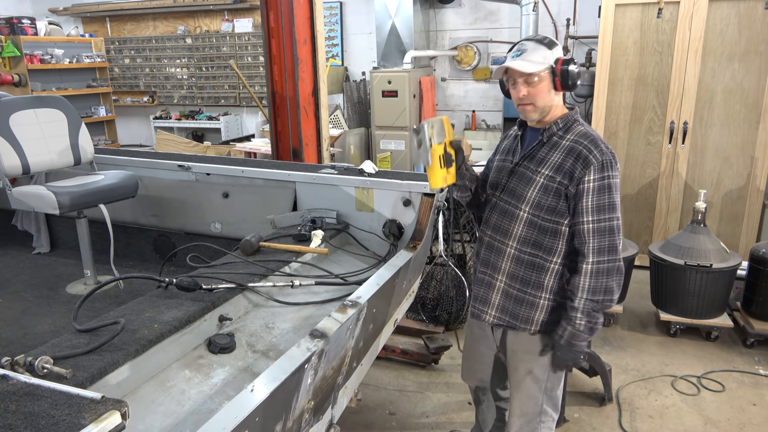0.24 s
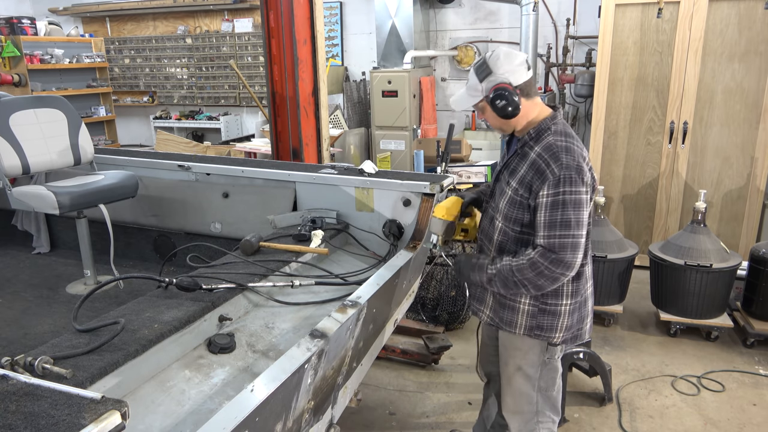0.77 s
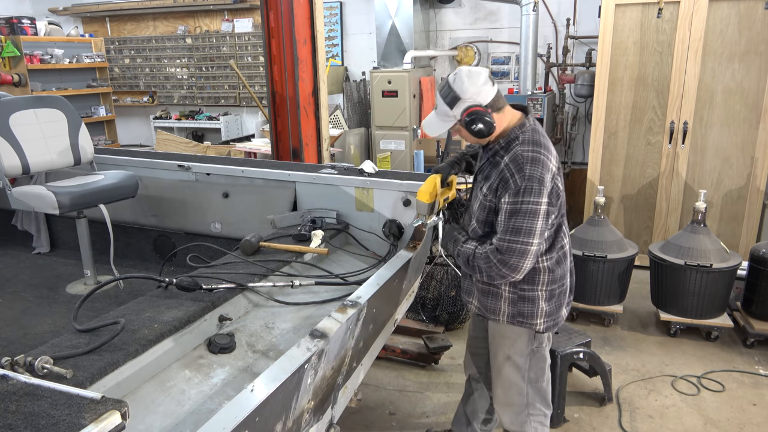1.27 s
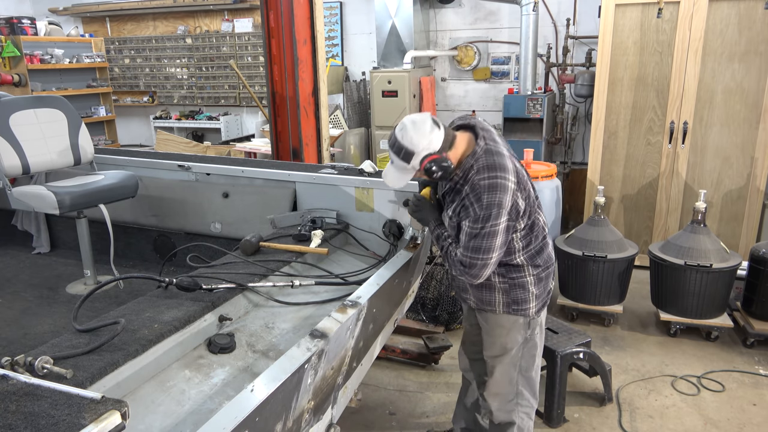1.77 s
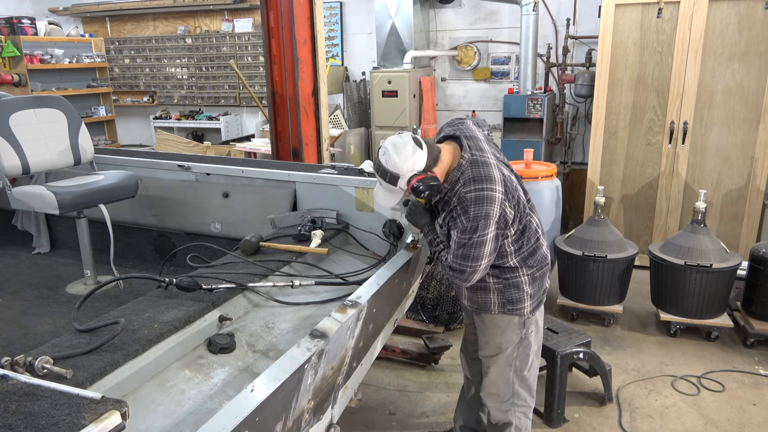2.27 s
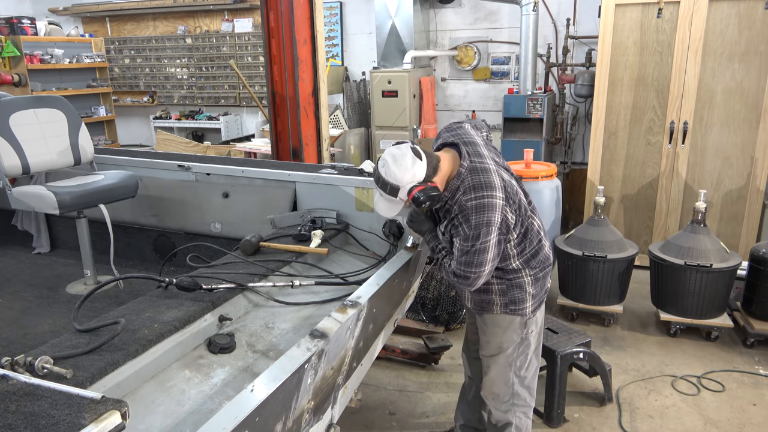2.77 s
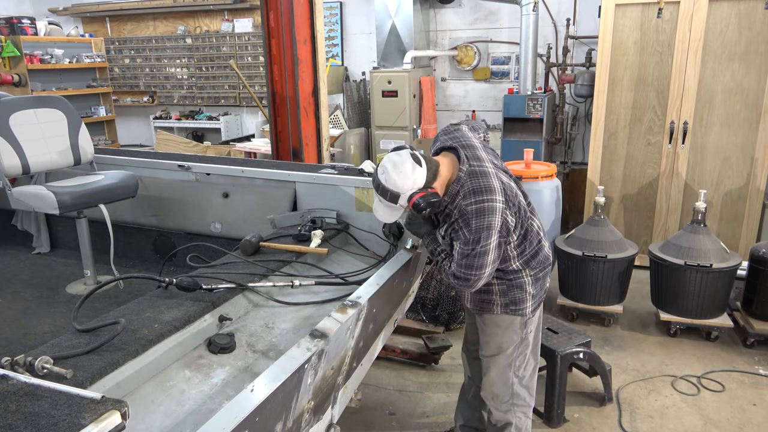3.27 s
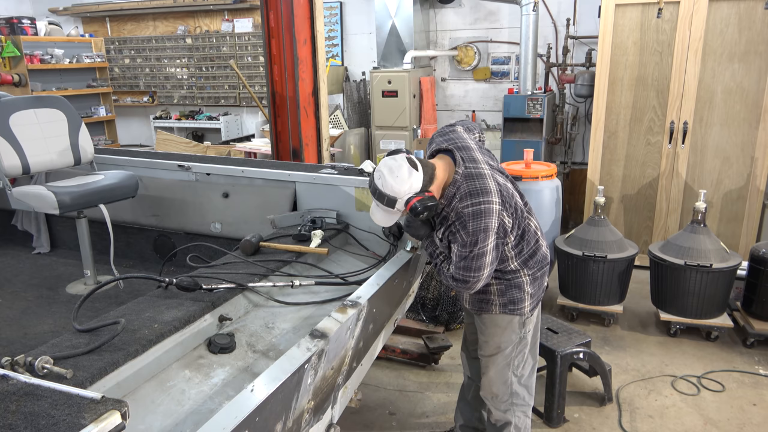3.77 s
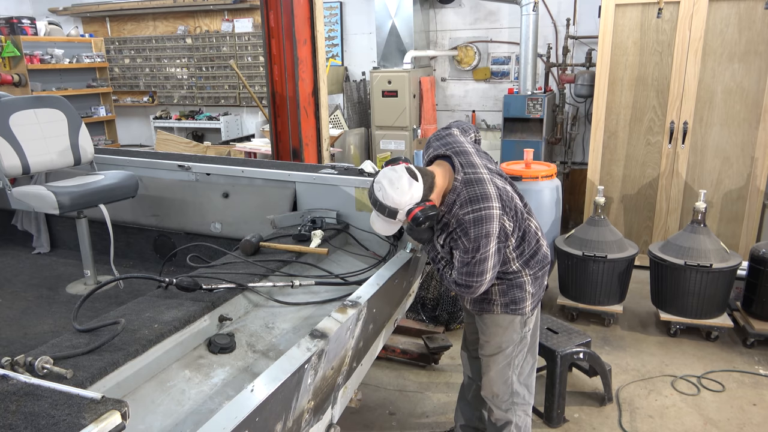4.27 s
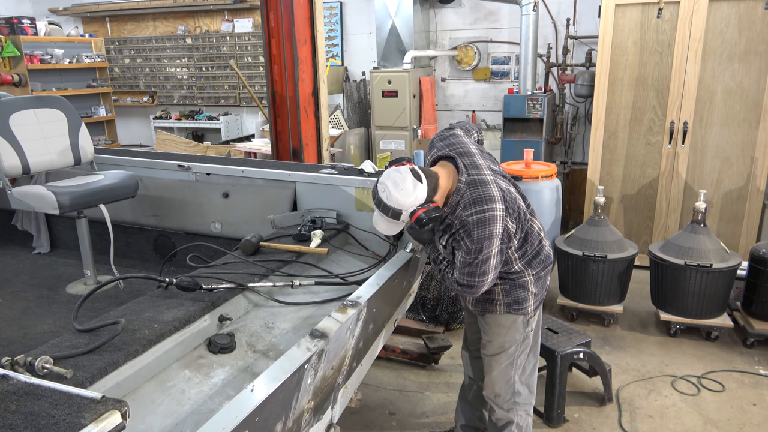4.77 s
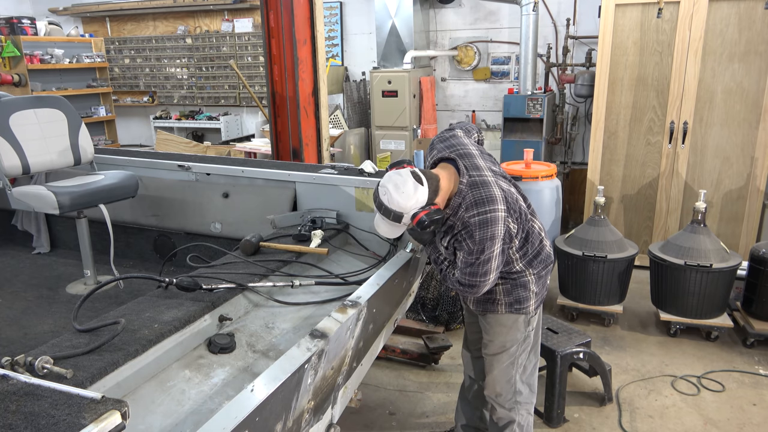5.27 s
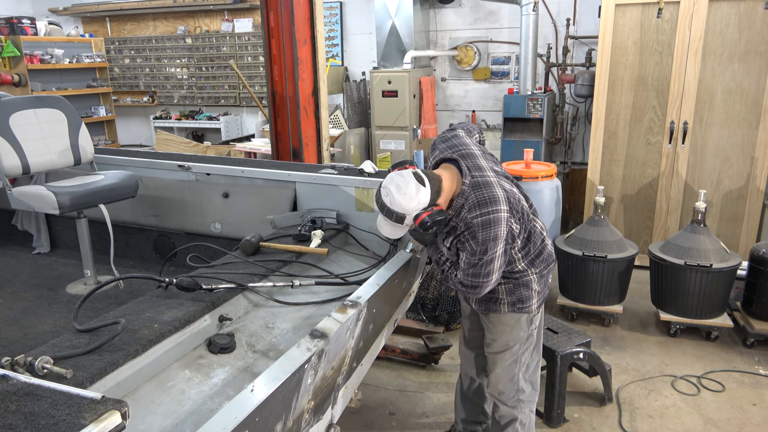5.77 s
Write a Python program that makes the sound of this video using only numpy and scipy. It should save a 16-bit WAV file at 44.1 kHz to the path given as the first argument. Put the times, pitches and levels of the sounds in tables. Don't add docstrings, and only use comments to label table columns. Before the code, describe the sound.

From 0 to about 0.7 s a jigsaw coasts to rest: a falling whine and gear roar fade, with blade-rod clicks spreading apart at 0.07, 0.17, 0.3 and 0.5 s. A low room hush remains. Between 1 and 2.6 s, boots and sleeves scuff softly; a crisp plastic snap and light knock fall at 1.86 s. A faint glove creak comes near 3.05 s, then a double plastic tick with a thin blade clink at 3.37 s. A firm knock on aluminium at 4.05 s leads to the loudest at 4.42 s, trailing a gritty skid, then a double knock and bright clamp clink around 4.62 s and a smaller knock at 4.96 s. At 5.05 s the motor starts, sweeps up steeply by 5.4 s, then climbs slightly to a steady buzzing roar, hiss and whine until 6 s. Short hard-walled reverberation, stereo microphones a few metres away.

```python
import sys
import numpy as np
from scipy import signal
from scipy.fft import rfft, irfft, next_fast_len
from scipy.io import wavfile
from scipy.ndimage import uniform_filter1d, map_coordinates

SR = 44100
rng = np.random.default_rng(int(sys.argv[2]) if len(sys.argv) > 2 else 0)


def log_audio(samples):
    frames = np.atleast_2d(samples).T
    limited = np.clip(frames, -1, 1)
    pcm = np.round(limited * 32767).astype(np.int16)
    wavfile.write(sys.argv[1], SR, pcm)


def field_ratio(decibels):
    return 10 ** (np.asarray(decibels, dtype=float) / 20)


N = 265923


def unit(x):
    return x / np.sqrt(np.mean(x ** 2) + 1e-20)


def along(points, hz):
    f, v = np.transpose(points)
    return np.interp(np.log(hz + 1), np.log(f + 1), v)


def curves(rows, outside=None):
    s, *cols = np.transpose(rows)
    return [np.interp(np.arange(N) / SR, s, c, outside, outside) for c in cols]


def wobble(rate):
    knots = rng.standard_normal(int(N * rate / SR) + 4)
    return map_coordinates(knots, [np.arange(N) * rate / SR])


def filtered(x, response):
    m = next_fast_len(N + SR // 2)
    return irfft(rfft(x, m) * response(np.fft.rfftfreq(m, 1 / SR)), m)[..., :N]


def modes(table):
    def response(f):
        total = 0
        for k, (centre, width, db) in enumerate(table):
            ring = 1j * f * width / (centre ** 2 - f ** 2 + 1j * f * width)
            total = total + (-1) ** k * field_ratio(db) * ring
        return total
    return response


def band(lo_hz, hi_hz):
    return lambda f: (1j * f / lo_hz / (1 + 1j * f / lo_hz) / (1 + 1j * f / hi_hz)) ** 2


def noise(response, grain_db=0):
    grain = np.repeat(rng.standard_normal(N // 20 + 1), 20)[:N]
    return unit(filtered(field_ratio(grain_db * grain) * rng.standard_normal(N), response))


# frequency in Hz, time to die by 60 dB in seconds
SHOP_DECAY = [(60, 0.67), (200, 0.37), (1000, 0.59), (4000, 0.47), (14000, 0.26)]


def room(x):
    hz, t, z = signal.stft(rng.standard_normal(SR // 2), SR, nperseg=256)
    decay = field_ratio(-60 * t / along(SHOP_DECAY, hz)[:, None])
    tail = signal.istft(z * decay, SR, nperseg=256)[1]
    late = np.pad(x, (250, 0))
    return signal.fftconvolve(late, tail / np.linalg.norm(tail))[:len(x)]


# frequency in Hz, level in dB per Hz
HUSH_COLOUR = [(12, -34), (20, -6.5), (67, -1.5), (234, -26.5), (422, -24), (485, -26.5), (698, -22),
               (759, -31), (1000, -24), (1120, -24.5), (1860, -34.5), (3950, -37.5), (16000, -41.5)]


def hush():
    level_db = -56.5 + 1.0 * wobble(6.95)
    duck_db = -6 * np.clip(np.arange(N) / SR - 4.9, 0, 1)
    return field_ratio(level_db + duck_db) * noise(lambda f: field_ratio(along(HUSH_COLOUR, f)))


def stroke_gain(peak_s, rise_s, hold_s, db):
    t = np.arange(N) / SR - peak_s
    fall_db = 45 * np.clip(t, 0, hold_s) + 105 * np.clip(t - hold_s, 0, None)
    rise_db = 20 * np.clip(-t, 0, None) / max(rise_s, .003)
    return field_ratio(db - fall_db - rise_db)


# peak in seconds, rise in seconds, hold in seconds, rub in dB, thud in dB
RUB_STROKES = [(0.987, 0.36, .02, -58, -9), (1.085, 0.092, 0.0011, -58.5, 3),
               (1.261, 0.03, 0.0037, -45.5, -4), (1.46, 0.13, .02, -79, 4), (1.62, 0.081, 0.033, -54, -4.5),
               (1.705, 0.064, 0.0045, -38.5, 3), (1.886, 0.022, 0.12, -47.5, -5.5),
               (2.187, .06, 0.14, -75.5, 11.5), (2.58, 0.055, 0.048, -51, -7.5),
               (3.164, 0.012, .005, -65.5, 12.5), (3.783, .03, 0.065, -83.5, 19),
               (4.01, .07, 0.092, -59, 5), (5.093, 0.021, .005, -41.5, 14)]
# peak in seconds, hold in seconds, rub, thud and grit in dB
SKID_STROKES = [
    (4.437, 0.16, -26.5, -3, -8),
    (4.652, 0.014, -32.5, 0.5, -20),
    (4.966, 0.017, -42, 7.5, -25),
]
# frequency in Hz, level in dB per Hz
RUB_COLOUR = [(88, -47), (150, -25), (244, -8), (285, -5.5), (420, 0), (462, -1), (509, -1), (1040, -4.5),
              (3620, -3), (12300, -40.5), (15500, -63)]
# frequency in Hz, width in Hz, level in dB
SHOE_RING = [(2030, 430, 9), (3400, 1000, -17.5)]


def scuffs():
    rubs = [(stroke_gain(s, rise, hold, db), thud_db, -3) for s, rise, hold, db, thud_db in RUB_STROKES]
    skids = [(stroke_gain(s, .013, hold, db), thud_db, grit_db)
             for s, hold, db, thud_db, grit_db in SKID_STROKES]

    def under(f, edge_hz):
        return 1 / np.sqrt(1 + (f / edge_hz) ** 4)

    colour = lambda f: field_ratio(along(RUB_COLOUR, f))
    thud = noise(lambda f: colour(f) * under(f, 740))
    hiss = noise(lambda f: colour(f) * (1 - under(f, 760)) * under(f, 2750), grain_db=2)
    grit = noise(lambda f: colour(f) * (1 - under(f, 5840)), grain_db=2.5)
    out = np.zeros(N)
    for gain, thud_db, grit_db in rubs + skids:
        out += gain * (field_ratio(thud_db) * thud + hiss + field_ratio(grit_db) * grit)
    out += field_ratio(-8) * sum(row[0] for row in skids) * noise(modes(SHOE_RING), grain_db=1)
    creak_db = -61 - 11 * ((np.arange(N) / SR - 3.055) / 0.043) ** 2
    creak = field_ratio(creak_db) * noise(modes([(1380, 470, 3), (2010, 500, -9)]), grain_db=-6)
    return creak + field_ratio(0.24 * wobble(40)) * out


# time in seconds, peak in dB
PLASTIC_TICKS = [(1.573, -42), (1.8635, -22), (2.497, -46), (3.168, -52), (3.185, -44), (3.364, -27.5),
                 (3.381, -31)]


def snaps():
    ticks = np.zeros(N)
    for s, db in PLASTIC_TICKS:
        ticks[round(s * SR)] = field_ratio(db + 9)
    dry = filtered(ticks, band(4500, 17000))
    return dry + field_ratio(4.5) * room(dry)


# start in seconds, peak in dB, then boom, knock and sizzle in dB
CONTACTS = [(1.236, -49.5, -22, -28, 12), (1.573, -40.5, -37, -32, -11), (1.863, -30, -26, -35, -6),
            (2.495, -58, -22, -16, 2), (3.167, -43, -15, -5, -6.5), (3.365, -36.5, -21, -4.5, 6),
            (3.788, -62.5, -3, 16, -0.5), (4.05, -19, -17.5, -5.5, -42), (4.424, -7, -30, -26, -39),
            (4.611, -12.5, -12.5, -11, -4.5), (4.628, -10, -17.5, -11, -50.5),
            (4.881, -30, -19.5, -17, -19), (4.961, -18, -30, -17, -27)]
# time in seconds, blade in dB, clamp in dB
STEEL_CLINKS = [
    (2.4968, -70, -43),
    (3.364, -25.5, -42),
    (4.6298, -45, -9),
    (4.9605, -42, -32),
]
# frequency in Hz, width in Hz, level in dB
HULL_RING = [(71, 20, -2.5), (120.4, 42, -1.5)]
# frequency in Hz, width in Hz, level in dB
PANEL_RING = [(217, 21.4, 3.5), (276, 16, -0.5), (322, 25, -5.5)]
# frequency in Hz, width in Hz, level in dB
SHEET_RING = [(473, 57, -3), (720, 250, -24), (1240, 110, -12), (2200, 3600, 0.5)]
# frequency in Hz, width in Hz, level in dB
BLADE_RING = [(2780, 10, 2), (2900, 14, 0), (3350, 25, -1), (8995, 25, 6)]
# frequency in Hz, width in Hz, level in dB
CLAMP_RING = [(4700, 300, -10), (6040, 360, 3), (6874, 200, -26), (6940, 220, 1), (12800, 400, -14)]


def knocks():
    t = np.arange(SR // 4) / SR
    rattle = (1 - np.exp(-t / 0.00038)) * (np.exp(-t / 0.012) + 0.79 * np.exp(-t / 0.00044))
    shove = np.exp(-((t - .005) / 0.00043) ** 2)
    crack, sheet, hull, panel, sizzle, blade, clamp = np.zeros((7, N + SR))
    for s, db, boom_db, knock_db, sizzle_db in CONTACTS:
        start = round(s * SR)
        at = slice(start, start + len(t))
        force = field_ratio(db) * rattle * rng.standard_normal((3, len(t)))
        crack[at] += force[0]
        sheet[at] += field_ratio(-6.5) * force[1]
        hull[at] += field_ratio(db + boom_db + 24) * shove
        panel[at] += field_ratio(db + knock_db + 15) * shove
        sizzle[at] += field_ratio(sizzle_db + 7) * force[2]
    for s, blade_db, clamp_db in STEEL_CLINKS:
        blade[round(s * SR)] = field_ratio(blade_db + 26)
        clamp[round(s * SR)] = field_ratio(clamp_db + 19)

    dull = band(100, 6000)
    parts = [
        (crack, lambda f: band(197, 2820)(f) * dull(f)),
        (sheet, lambda f: modes(SHEET_RING)(f) * dull(f)),
        (hull, modes(HULL_RING)),
        (panel, modes(PANEL_RING)),
        (sizzle, lambda f: band(5000, 10000)(f) / (1 + 1j * f / 11000) ** 2),
        (blade, modes(BLADE_RING)),
        (clamp, lambda f: modes(CLAMP_RING)(f) * band(3000, 20000)(f)),
    ]
    dry = sum(filtered(x[:N], colour) for x, colour in parts)
    out = np.pad(dry, (0, SR))
    starts = [round(row[0] * SR) for row in CONTACTS] + [N]
    for a, b in zip(starts, starts[1:]):
        piece = np.pad(dry[a:min(b, a + SR // 2)], (0, SR // 2))
        out[a:a + len(piece)] += room(piece)
    return out[:N]


# time in seconds, peak in dB
SLOW_REVERSALS = [
    (.0703, -28.5),
    (0.171, -33),
    (0.2981, -36.5),
    (.5029, -46),
    (5.0924, -36),
    (5.165, -31),
]


def reversals(stroke):
    first = round(5.213 * SR)
    cycle = np.floor((stroke[first:] - stroke[first]) / (2 * np.pi))
    turn = first + np.flatnonzero(np.diff(cycle, prepend=-1))
    ticks = np.zeros(N)
    ticks[turn] = field_ratio(-31.5 + 3.1 * rng.standard_normal(len(turn)))
    for s, db in SLOW_REVERSALS:
        ticks[round(s * SR)] = field_ratio(db)
    ticks += .6 * np.roll(ticks, round(.013 * SR))
    guide = modes([(8600, 990, -13), (11140, 760, 4), (13400, 900, -1), (15300, 900, -8)])
    burst = field_ratio(34) * filtered(ticks, lambda f: guide(f) * band(7000, 20000)(f))
    return burst + field_ratio(1) * room(burst)


# time in seconds, turns in Hz, gear mesh in dB
COASTING = [(0, 112, -46), (.1, 95, -41), (.2, 80, -36), (.3, 64.7, -39), (.45, 46, -49), (.56, 31, -68),
            (.8, 12, -110)]
# time in seconds, turns in Hz
RUN_UP = [(5.03, 20), (5.3, 300), (5.35, 327), (5.408, 348), (5.466, 362), (5.604, 381.5), (5.78, 396.5),
          (5.9, 401), (6.03, 403)]
# time in seconds, roar in dB
GEAR_ROAR = [
    [(0.0, -31.5), (0.04, -24), (0.272, -25.5), (0.29, -28), (0.356, -27), (0.44, -29), (0.59, -37.5),
     (0.788, -62), (0.85, -64.5)],
    [(5.02, -37), (5.06, -32.5), (5.106, -25), (5.182, -20), (5.194, -22.5), (6.03, -23)],
]
# frequency in Hz, level in dB per Hz
GEAR_COLOUR = [(120, -60), (200, -30), (281, -20), (385, -6), (431, -4), (549, 0.5), (818, 2), (1740, 0.5),
               (6000, -12), (7800, -43), (13200, -120)]
# frequency in Hz, width in Hz, level in dB
HOUSING_RING = [(382, 18, -11), (504, 84, -13.5), (792, 10.6, -0.5), (936, 18, -4.5), (1327, 10, 1.5),
                (1663, 15, -2.5), (1885, 84, -5.5), (2108, 20, 4.5), (2290, 420, -3.5), (3150, 70, 1),
                (3640, 40, -12)]
# frequency in Hz, level in dB per Hz
AIR_COLOUR = [(2060, -6), (3500, 1), (5600, -3), (6360, 0), (9200, -7), (10400, -11.5), (11000, -12),
              (15100, -20.5), (16000, -48)]


def roar(stroke):
    gears = uniform_filter1d(sum(field_ratio(curves(rows, -200)[0]) for rows in GEAR_ROAR), size=200)
    turns = np.where(np.arange(N) < SR, curves(COASTING)[0], curves(RUN_UP)[0])
    air = gears * field_ratio(0.2) * (1 + (103 / turns) ** 2) ** (-1.15 / 2)
    beat = np.cos(2 * stroke)
    body = lambda f: field_ratio(along(GEAR_COLOUR, f)) * (1 + 2.66 * np.abs(modes(HOUSING_RING)(f)))
    rumble = field_ratio(0.8 * beat + 0.7 * wobble(20)) * noise(body, grain_db=0.5)
    breath = lambda f: field_ratio(along(AIR_COLOUR, f)) * band(150, 40000)(f)
    hiss = field_ratio(0.77 * beat + 0.2 * wobble(4)) * noise(breath, grain_db=1.5)
    return gears * rumble + air * hiss


# multiple of the turns, level in dB, resonance in Hz, its width in octaves
ORDER_LIFTS = [(1, -42, 280, 1.2), (1, -33, 300, .06), (1, -29, 380, .11), (13, -26, 1900, .3),
               (13, -32, 2700, .5), (13, -26, 3500, .13), (13, -31, 4600, .14), (13, -45, 5200, .2),
               (26, -54, 8000, 2.2), (26, -40, 10200, .18), (26, -36, 10450, .012), (39, -39, 12100, .13)]


def order_gain(multiple, turns):
    gain = 0
    for k, db, peak_hz, octaves in ORDER_LIFTS:
        if k == multiple:
            gain = gain + field_ratio(db - 12 * (np.log2(k * turns / peak_hz) / octaves) ** 2)
    if multiple != 1:
        return gain
    since = np.arange(N) / SR - 5.76
    pressed = 1 / (1 + np.exp(np.clip(-since / .012, -50, 50)))
    return gain * field_ratio(np.minimum(-15 + 45 * since, 0) * pressed)


# multiple of the turns, blur in Hz, level in dB, resonance in Hz, width in octaves
MESH_ORDERS = [(2, 30, -35, 788, .03), (8, 200, -26, 2100, .8), (16, 320, -29, 6350, .3),
               (32, 250, -43, 11800, .15)]
# multiple of the blade stroke, level in dB
CRANK_ORDERS = [(2, -55), (3, -39), (4, -49), (5, -43), (6, -47), (7, -44), (8, -41), (10, -40), (11, -44)]


def whine():
    turns = uniform_filter1d(curves(RUN_UP)[0], size=2000)
    on = np.clip((np.arange(N) / SR - RUN_UP[0][0]) / 0.05, 0, 1)
    phase = 2 * np.pi * np.cumsum(turns) / SR
    stroke = phase / 9
    out = np.zeros(N)
    for k in (1, 13, 26, 39):
        out += np.sqrt(2) * order_gain(k, turns) * field_ratio(1.8 * wobble(50)) * np.sin(k * phase)
    for k, blur, db, peak_hz, octaves in MESH_ORDERS:
        detune = np.log2(k * turns / peak_hz) / octaves
        out += field_ratio(db - 12 * detune ** 2) * (.4 + wobble(blur)) * np.sin(k * phase)
    out += field_ratio(-38.5) * noise(lambda f: band(130, 400)(f) ** 2)
    shake = np.clip(turns / 300, 0, 1) ** 3
    for k, db in CRANK_ORDERS:
        throb = np.sin(k * stroke + rng.uniform(0, 6.25))
        out += np.sqrt(2) * field_ratio(db + 0.86 * wobble(15)) * shake * throb
    slow_turns, slow_db = curves(COASTING)[0], curves(COASTING, -200)[1]
    slow_phase = 2 * np.pi * np.cumsum(slow_turns) / SR
    dying = np.zeros(N)
    for k, db in ((5, -34), (8, 0), (13, -5), (16, -4)):
        dying += field_ratio(db + 3.1 * wobble(26.5)) * np.sin(k * slow_phase)
    return on * out + field_ratio(slow_db) * dying, stroke


# frequency in Hz, side minus mid in dB
STEREO_WIDTH = [(60, -17), (110, -14.5), (200, -13.5), (380, -13.5), (700, -16.5), (1290, -20),
                (2380, -18.5), (4400, -19), (8120, -6), (15000, -12.5)]


def capsules(mid):
    scatter = rng.standard_normal(5000) * np.exp(-np.arange(5000) / 900)
    side = signal.fftconvolve(mid, scatter / np.linalg.norm(scatter))[:N]
    side = filtered(side, lambda f: field_ratio(along(STEREO_WIDTH, f)))
    return np.array([mid + side, mid - side])


def scene():
    tones, stroke = whine()
    middle = filtered(tones, lambda f: (f > 1000) * (f < 7000))
    motor = tones - .55 * middle + .9 * room(middle)
    return capsules(hush() + scuffs() + snaps() + knocks() + reversals(stroke) + roar(stroke) + motor)


def low_pass(x):
    return signal.sosfilt(signal.butter(12, 16510, fs=SR, output="sos"), x)


def record(dry):
    soft = dry / (1 + np.abs(dry / .45) ** 4) ** (1 / 4)
    mix = filtered(soft, lambda f: f < 15900)
    return low_pass(mix)


dry = scene()
out = record(dry)
log_audio(out)
```